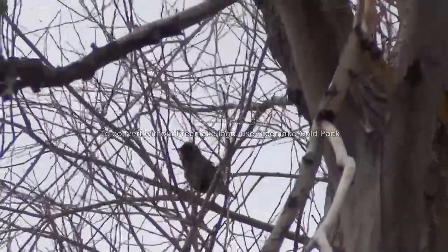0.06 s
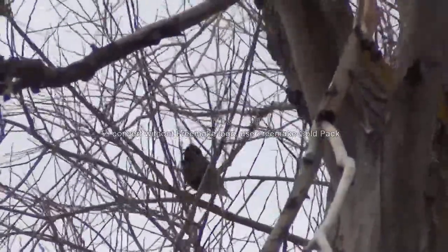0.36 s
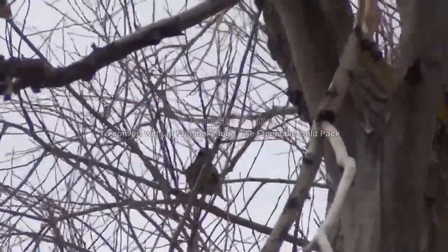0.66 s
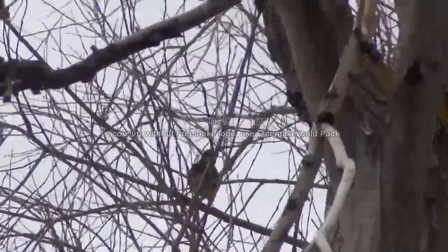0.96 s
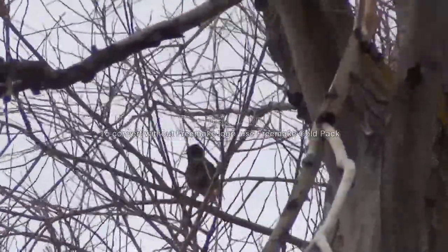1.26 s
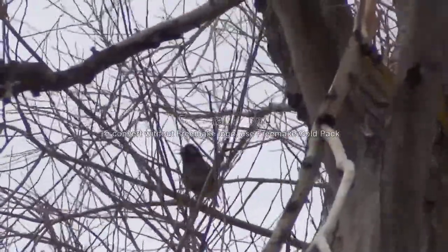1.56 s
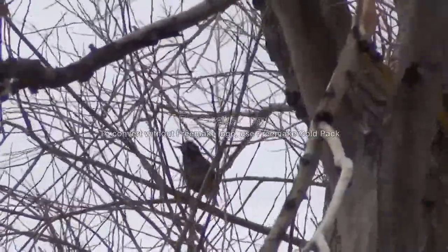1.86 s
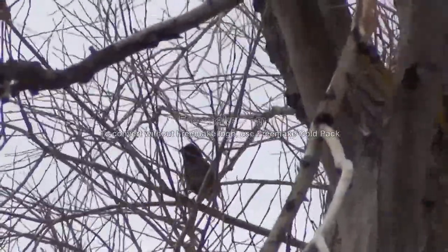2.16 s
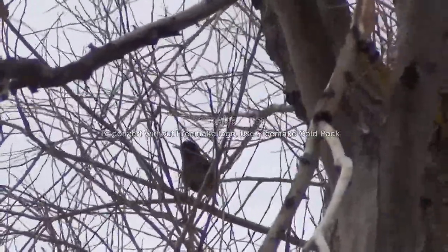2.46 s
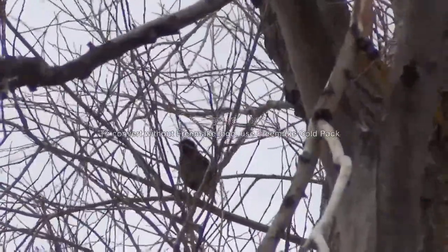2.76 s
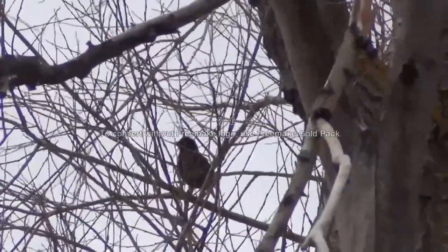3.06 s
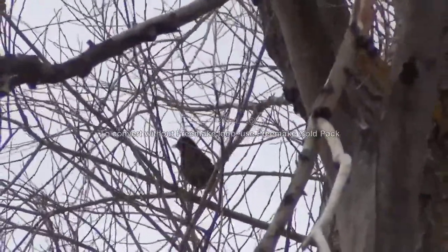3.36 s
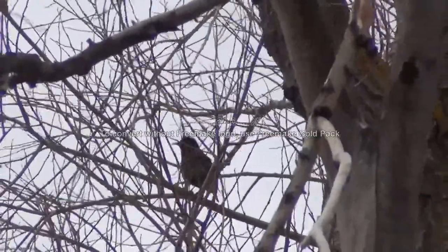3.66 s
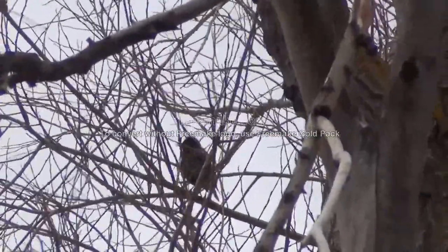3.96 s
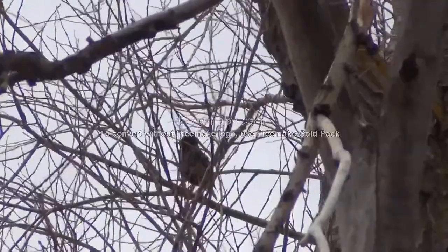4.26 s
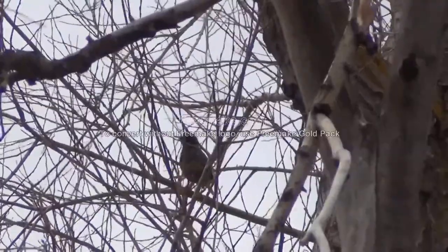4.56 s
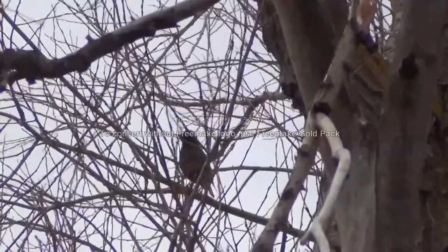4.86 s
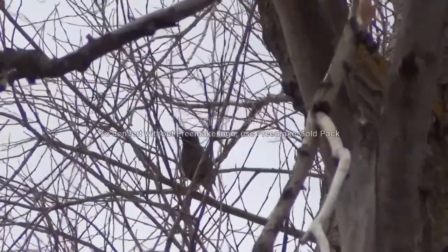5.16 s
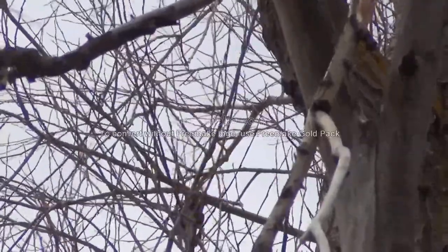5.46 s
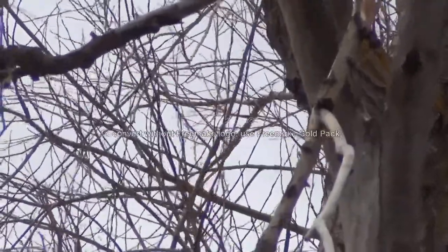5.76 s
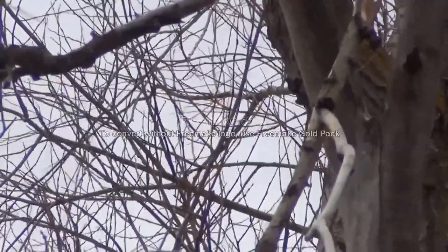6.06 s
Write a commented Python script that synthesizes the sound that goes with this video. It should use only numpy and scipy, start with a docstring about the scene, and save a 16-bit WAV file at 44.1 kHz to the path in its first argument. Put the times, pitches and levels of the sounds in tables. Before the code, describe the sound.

A starling sings quietly in a tree outdoors, over a faint electrical hum and distant rumble. For the first second and a half it gives short chirps, piping notes and hoarse rasps. From about 1.5 to 2.8 seconds an air rifle is worked close to the microphone: bright steel clacks, dull knocks on the stock and soft hand rustle, ending with a snap shut, while the bird chirps in between. The bird twitters from 3.2 seconds, holds a high whistle at 3.5 that slides downward, and rasps again near 4.8. At about 5.2 seconds the rifle fires once, the loudest sound: a sharp rush of air with hard ticks, a brief spring thrum, a thin steel ring and a short hissing tail. The background dips and creeps back. Light rustle, a faint chirp and a piping note follow, with a soft knock near 6.2 seconds.

```python
"""A starling rasps, chirps and whistles in a bare tree, over a faint mains hum and distant rumble.
Close by, the action of an air rifle is worked: steel parts clack, bounce and snap shut, knocking the stock.
Then the shot: a rush of air, a thrumming spring and a thin steel ring.
The microphone's automatic gain ducks under it and creeps back."""
import sys
import numpy as np
from scipy import signal
from scipy.fft import rfft, irfft, next_fast_len
from scipy.io import wavfile
from scipy.ndimage import map_coordinates

SR = 44100
rng = np.random.default_rng(int(sys.argv[2]) if len(sys.argv) > 2 else 0)


def bounce(signal):
    """Save signal as a 16-bit WAV file at the path given by the first command-line argument."""
    frames = np.transpose(np.atleast_2d(signal))
    limited = np.clip(frames, -1, 1)
    pcm = np.round(limited * 32767).astype(np.int16)
    wavfile.write(sys.argv[1], SR, pcm)


N = 274302

# Ringing modes of the steel and of the stock: (frequency [Hz], bandwidth [Hz], level [dB])
STEEL_MODES = [(1487, 56, -3), (1970, 79, 0), (2168, 55, -0.5), (2362, 92, 6), (2656, 430, -8),
               (3520, 120, -23), (6950, 290, -10.5), (8120, 260, -13)]
STOCK_MODES = [(149, 51, -1), (374, 72, 1), (544, 68, 2), (764.5, 24, 4.5), (860, 33, 4), (1188, 77, 3.5)]
# Tone colour of the air blast, its hissing tail and its low thump: (frequency [Hz], level [dB])
BLAST_EQ = [(25, -6.5), (60, -7), (250, -2), (520, -14), (790, 4), (1000, -15), (1500, 4), (2600, -1),
            (3700, 2), (6300, -2), (8200, -2), (12000, -1.5), (15500, -4)]
HISS_EQ = [(60, 6), (200, -10), (1000, -3.5), (3000, 0), (8000, 1), (11000, -2), (15500, -10.5)]
THUMP_EQ = [(12, -14.5), (25, -3.5), (42, 4.5), (58, -0.5), (80, -25), (200, -66)]
SHOT_S = 5.222  # the trigger breaks


def shot():
    """Air rushes through the ringing rifle, the spring thrums, the steel sings; a hiss trails off."""
    gusts = envelope(SHOT_S, attack_s=.022, hold_s=.063, fall_db_per_s=1899, depth_db=18.5)
    gusts *= amp(-19.5 + 1.76 * wobble(400))
    shaken = resonate(gusts * rng.standard_normal(N), STEEL_MODES + STOCK_MODES)
    rush = gusts * noise(BLAST_EQ) + amp(-15.5) * np.std(gusts) * shaken
    spring = envelope(SHOT_S, attack_s=.022, hold_s=.062, fall_db_per_s=700, depth_db=32)
    spring *= amp(-30 + 1.56 * wobble(60))
    spring *= np.sin(phase_of(150 + 13 * wobble(70)))
    thump_size = round(.12 * SR)
    thump = amp(-47) * unit(noise(THUMP_EQ)[:thump_size]) * signal.windows.tukey(thump_size, .3)
    ring = envelope(SHOT_S, attack_s=.049, hold_s=.018, fall_db_per_s=750, depth_db=25.5)
    ring *= amp(-21.5 + 2.5 * wobble(300))
    ring *= np.sqrt(2) * np.sin(phase_of(12735 + 85 * wobble(300)))
    leak = envelope(SHOT_S, attack_s=.08, hold_s=.045, fall_db_per_s=252, depth_db=30)
    leak *= amp(-30 + 2.2 * wobble(700))  # fast flicker makes the hiss crackle
    report = rush + spring + ring + leak * noise(HISS_EQ)
    add(report, SHOT_S + .006, thump)  # the pressure wave hits the microphone
    walls = amp(-20.5) * echoes(report, WALL_DECAY, width=.544)
    return report + walls + amp(-33) * echoes(report, GARDEN_DECAY, width=.5)


# Steel clacks of the action:
# (time [s], level [dB], knock send [dB], ring send [dB], treble tilt [dB/octave], t60 [s])
CLACK_CUES = [(.507, -54, -8, 4, 0, 0.034), (.532, -46.5, -12, -1.5, 9, 0.038),
              (1.5562, -25, -3, 7.5, -3.5, 0.042), (1.6686, -38, -1.5, 4.5, -1.5, .15),
              (1.7659, -30.5, -15, -6, 0, .04), (1.7698, -28.5, -3.5, -4, -1.5, 0.034),
              (1.773, -21, -20, -4.5, 0, .023), (1.786, -25, -14, -11, -.5, 0.086),
              (1.849, -24, -2, 7, -2.5, .034), (2.0184, -30.5, 3, 4.5, 4.5, 0.025),
              (2.069, -44.5, -6, 2, -6.5, 0.045), (2.099, -34.5, -14, -6.5, -5, 0.069),
              (2.138, -30, -14, -3, -5.5, 0.052), (2.146, -39, -7, 12, -15, 0.022),
              (2.216, -40.5, 6.5, 6.5, -2.5, 0.053), (2.53, -41.5, 3.5, -0.5, -7, 0.041),
              (2.7673, -22, -2.5, -4.5, -0.5, 0.066), (2.922, -60.5, -9, -12, 0, 0.17),
              (6.1712, -37.5, 5, -2, -15.5, 0.022)]
# Dull knocks on the stock: (time [s], level [dB], knock send [dB], treble tilt [dB/octave])
KNOCK_CUES = [(2.254, -48.5, 18, 0), (2.3385, -40, 13, -15.5), (2.344, -49, 14, -18),
              (2.587, -49.5, 18, -26), (2.594, -49, 12, -28)]
# Hard ticks of the mechanism as it fires: (time [s], level [dB])
TICK_CUES = [(5.2299, -23), (5.2342, -22), (5.2382, -16.5), (5.3162, -9), (5.32, -23.5), (5.341, -27),
             (5.352, -18.5)]
SCRAPE_S = .004  # lead-in to each contact


def rifle_action(bounce_s=.007, bounce_db=-11.5, chatter_s=.12):
    """Bright clacks that bounce once, dull knocks, and the ticks and random steel chatter of firing."""
    out = np.zeros((2, N))
    for s, db, *timbre in CLACK_CUES:
        add(out, s - SCRAPE_S, contact(db, *timbre))
        add(out, s - SCRAPE_S + bounce_s, contact(db + bounce_db, *timbre))
    for s, db, knock_db, tilt_db in KNOCK_CUES:
        add(out, s - SCRAPE_S, contact(db, knock_db, ring_db=-11, tilt_db=tilt_db, t60=.018))
    chatter = [(SHOT_S + .012 + chatter_s * when, -27.5 - 8 * weak) for when, weak in rng.random((14, 2))]
    for s, db in TICK_CUES + chatter:
        add(out, s - SCRAPE_S, contact(db, knock_db=-7.5, ring_db=-16, tilt_db=11.5, t60=.0055))
    return out


# Tone colour of a contact's transient: (frequency [Hz], level [dB])
CRACK_EQ = [(100, -27), (900, -20.5), (1500, -3), (2300, 0.5), (4500, 0.5), (5500, 0.5), (6200, -3),
            (7500, -5.5), (11000, -2.5), (15500, -15)]


def contact(db, knock_db, ring_db, tilt_db, t60):
    """One contact scrapes in, cracks, rings the steel and knocks the stock; nearby walls answer."""
    t = np.arange(SR // 3) / SR
    blow = (t >= SCRAPE_S) * amp(-60 * np.maximum(t - SCRAPE_S, 0) / t60)
    scrape = (t < SCRAPE_S) * amp(-15) * t / SCRAPE_S
    colour = [(hz, level + tilt_db * np.log2(max(hz, 1000) / 3000)) for hz, level in CRACK_EQ]
    crack = noise(colour, len(t)) * (scrape + blow) * amp(.5 * wobble(930, len(t)))
    ring = amp(ring_db - 4.5) * resonate(rng.standard_normal(len(t)) * blow ** 4, STEEL_MODES)
    knock = amp(knock_db - 10) * resonate(rng.standard_normal(len(t)) * blow ** 4, STOCK_MODES)
    clack = crack + np.std(crack) * (ring + knock)
    return amp(db) * (clack + amp(-5) * echoes(clack, WALL_DECAY, width=.21))


# Soft thuds of the hands: (time [s], level [dB], pitch [Hz], t60 [s])
BUMP_CUES = [(2.139, -41, 149, 0.24), (2.196, -36, 182, 0.068), (6.169, -42.5, 221, 0.14)]


def hand_bumps():
    """Each time a hand meets the stock it gives one low, damped thud."""
    out, t = np.zeros(N), np.arange(SR // 4) / SR
    attack = 1 - np.exp(-t / .0048)
    for s, db, hz, t60 in BUMP_CUES:
        add(out, s, amp(db - 60 * t / t60) * np.sin(2 * np.pi * hz * t) * attack)
    return out


# Falling chirps: (time [s], length [s], pitch [Hz], fall [share of pitch], level [dB], rasp [0-1])
CHIRP_CUES = [(0.142, .034, 3000, 0.016, -65, 0.73), (.243, .03, 4900, 0, -66.5, 0.7),
              (0.286, .033, 2400, .08, -65.5, 0.82), (.49, 0.027, 2010, 0.018, -58, .15),
              (0.59, .054, 4600, .06, -70, .8), (.935, .04, 2100, .07, -60.5, 0.82),
              (0.999, .048, 2130, .28, -62, .25), (1.001, .048, 3170, .26, -64.5, .25),
              (1.112, 0.031, 3280, .08, -55, .3), (1.113, 0.065, 2380, .15, -58.5, .7),
              (1.922, 0.033, 2930, .14, -55.5, .05), (2.043, .016, 1980, .07, -40.5, 0.27),
              (2.073, .055, 5010, 0.13, -56, 0.35), (2.106, 0.0256, 2056, 0.136, -42.5, .36),
              (2.556, .033, 2560, 0.096, -57.5, .85), (3.057, .034, 2555, .03, -60, 0.15),
              (3.82, .022, 2470, .14, -64, 0.84), (4.02, .065, 2370, 0, -65.5, 0.88),
              (4.455, 0.029, 2320, 0.11, -57.5, .95), (5.157, .03, 4100, .08, -61.5, .8),
              (5.533, 0.069, 1760, 0, -58.5, .8)]
# Arched twitters, strongest at the octave: (time [s], length [s], pitch [Hz], level [dB])
TWITTER_CUES = [(3.225, .054, 2320, -70), (3.264, .082, 2560, -63.5), (3.373, .06, 2540, -67.5),
                (3.428, 0.048, 2676, -56), (3.457, 0.03, 2930, -56.5), (3.865, .065, 2560, -63),
                (3.918, 0.069, 2684, -59.5), (4.088, 0.065, 2575, -62.5), (4.255, 0.069, 2645, -62.5)]
# Hoarse arched rasps: (time [s], length [s], pitch [Hz], level [dB], loudest harmonic [number])
RASP_CUES = [(0, .13, 3600, -68.5, 1.33), (1.348, .15, 3300, -62.5, 2.1), (1.492, 0.17, 3010, -59, 2.3),
             (4.673, .13, 3580, -62, 1.75), (4.705, 0.1, 3100, -63, 1.53), (4.844, .15, 3220, -57.5, 1.8),
             (4.87, .12, 2987, -60.5, 1.41)]
# Piping notes that scoop up to pitch:
# (time [s], length [s], pitch [Hz], level [dB], scoop [share of pitch], loudest harmonic [number])
PIPE_CUES = [(1.136, 0.114, 2930, -63, 0, 1.27), (1.206, .11, 1481, -57.5, 0.036, 1.42),
             (1.292, 0.12, 1465, -64.5, 0, 1.5), (1.383, .093, 1517, -58.5, .02, 1),
             (1.99, .075, 3190, -50, .19, 1), (2.211, .09, 4766, -54, .06, 1),
             (6.04, 0.18, 1510, -65.5, 0.04, 0.91)]


def starling():
    """Chirps, twitters, rasps, piping notes and one long whistle, echoing in the garden."""
    song = whistle()
    for s, length, hz, fall, db, rasp in CHIRP_CUES:
        bend = (1 + .42 * fall, 1 - .58 * fall)  # the fall steepens in the second half
        add(song, s, note(length, hz, db, bend, loudest=1.1, rasp=rasp, fall_db=27))
    for s, length, hz, db in TWITTER_CUES:
        add(song, s, note(length, hz, db, bend=(.89, .92), loudest=2.15, rasp=.253, fall_db=19.5))
    for s, length, hz, db, loudest in RASP_CUES:
        add(song, s, note(length, hz, db, bend=(.76, .84), loudest=loudest, rasp=.72, fall_db=25.5))
    for s, length, hz, db, scoop, loudest in PIPE_CUES:
        add(song, s, note(length, hz, db, bend=(1 - scoop, 1), loudest=loudest, rasp=.198, fall_db=27))
    return song + amp(-7) * echoes(song, GARDEN_DECAY, width=.12)


# Held part of the whistle: (time [s], pitch [Hz], fundamental level [dB], octave level [dB])
WHISTLE_CURVE = [(3.48, 3180, -66, -66), (3.496, 3210, -52, -66), (3.512, 3117, -53.5, -72),
                 (3.53, 3173, -68, -73), (3.558, 3250, -64.5, -71), (3.646, 3200, -71, -68),
                 (3.68, 3388, -71, -71)]
# Closing slide, a voice on each side of the syrinx: (top pitch [Hz], target pitch [Hz], level [dB])
SLIDE_PAIR = [(4720, 3660, -47), (4050, 3100, -59)]


def whistle(slide_start_s=3.68, slide_length_s=.22, settle_s=.062, fall_db=19):
    """A held tone whose octave comes forward, then two voices sliding down, duller as they fade."""
    t = np.arange(N) / SR
    times, *columns = np.transpose(WHISTLE_CURVE)
    pitch, fundamental_db, octave_db = [np.interp(t, times, column) for column in columns]
    loudest = np.clip(1.5 + (octave_db - fundamental_db) / (2 * fall_db), 1, 2)
    held = (t >= times[0]) & (t <= times[-1])
    level = held * amp(2) * np.hypot(amp(fundamental_db), amp(octave_db))
    out = level * syrinx(pitch, loudest, rasp=.12, fall_db=fall_db)
    age = np.maximum(t - slide_start_s, 0)
    effort = envelope(slide_start_s, attack_s=.016, hold_s=.044, fall_db_per_s=208, depth_db=36)
    effort *= age < slide_length_s
    for top_hz, target_hz, db in SLIDE_PAIR:
        pitch = target_hz + (top_hz - target_hz) * np.exp(-age / settle_s)
        out += amp(db) * effort * syrinx(pitch, 1 + .29 * effort, rasp=.1, fall_db=fall_db)
    return out


def note(length, hz, db, bend, loudest, rasp, fall_db):
    """One note swells and fades, arching through hz; bend holds its start and end pitch ratios."""
    progress = np.linspace(0, 1, int(length * SR))
    arch = np.polyval(np.polyfit([0, .5, 1], [bend[0], 1, bend[1]], 2), progress)
    pitch = hz * arch * (1 + .0083 * wobble(139.6, len(arch)))
    return amp(db) * signal.windows.tukey(len(arch), .5) * syrinx(pitch, loudest, rasp, fall_db)


def syrinx(pitch, loudest, rasp, fall_db):
    """The throat favours one harmonic, the rest drop fall_db a step; rasp smears each into noise."""
    size = len(pitch)
    phase = phase_of(pitch * (1 + .034 * rasp ** 2 * wobble(260, size)))
    tone = np.zeros(size)
    for k in range(1, 5):
        rate = (300 + 600 * rasp) * k
        flutter = wobble(rate, size) + 1j * wobble(rate, size)
        partial = np.real((1 - rasp + rasp * flutter) * np.exp(1j * k * phase))
        tone += amp(-fall_db * abs(k - loudest)) * partial
    return unit(tone * amp(2.1 * wobble(110, size)))


# Swells of rustle as the hands shift, and a brief flutter of wings at 5.58 s: (time [s], half width [s], level
# [dB])
RUSTLE_CUES = [(1.3, 0.47, -61.5), (2.19, 0.06, -50), (2.38, 0.055, -57.5), (2.575, 0.042, -56.5),
               (3.03, 0.094, -57), (5.58, 0.12, -55.5), (5.76, .16, -62)]
# Tone colour of the rustle: (frequency [Hz], level [dB])
RUSTLE_EQ = [(100, -10), (200, 5), (700, -2), (2000, -2.5), (3500, -9), (8000, -16), (15000, -21.5)]


def hand_rustle(floor_db=-66):
    """Hands on the rifle make a grainy rustle that swells when they shift; once, wings flutter."""
    t = np.arange(N) / SR
    swells = sum(amp(db) ** 2 * np.exp(-((t - s) / width) ** 2) for s, width, db in RUSTLE_CUES)
    grain = amp(1.9 * wobble(35) + 1.3 * wobble(250))
    return np.sqrt(amp(floor_db) ** 2 + swells) * grain * stereo_noise(RUSTLE_EQ)


# Tone colour of the low and high ambience beds: (frequency [Hz], level [dB])
RUMBLE_EQ = [(15, -59), (25, -31), (40, -11), (54, -2), (86, -2.5), (211, -0.5), (253, -0.5), (364, -6.5),
             (389, -14), (415, 1), (451, -21), (474, -1.5), (507, -15.5), (889, -11), (1300, -23),
             (1690, -48), (2860, -120)]
AIR_EQ = [(470, -33), (800, -5.5), (1380, -6.5), (1620, -25), (1770, -26), (2800, -17), (3960, -16),
          (5750, -22), (15500, -17)]


def ambience():
    """Distant rumble and faint hiss, each drifting slightly in level."""
    rumble = amp(-59.5 + .82 * wobble(5.07)) * stereo_noise(RUMBLE_EQ)
    return rumble + amp(-69 + .63 * wobble(1.8)) * stereo_noise(AIR_EQ)


# Partials of the hum: (frequency [Hz], level [dB])
HUM_PARTIALS = [(60, -66.5), (120, -71), (180, -74), (420, -72.5)]


def mains_hum():
    """Harmonics of the mains, each wavering in level and phase."""
    t = np.arange(N) / SR
    return sum(amp(db + 1.2 * wobble(5.8)) * np.sqrt(2) * np.sin(2 * np.pi * hz * t + .37 * wobble(4.2))
               for hz, db in HUM_PARTIALS)


# Reverb time of the nearby walls and of the garden: (frequency [Hz], t60 [s])
WALL_DECAY = [(200, 0.42), (1400, 0.16), (4000, 0.16), (12000, 0.15)]
GARDEN_DECAY = [(1000, 0.19), (4000, 0.44), (10000, 0.47)]
# Stereo width of the reverb: (frequency [Hz], side gain [dB])
REVERB_WIDTH = [(300, -1), (1000, 1.5), (3000, -6.5), (5000, -1.5), (6500, 11), (8500, 6), (11500, -5),
                (15000, -10)]


def echoes(x, decay, width):
    """Stereo reflections in which each frequency dies at its own speed."""
    hz, t, spectra = signal.stft(rng.standard_normal((2, SR // 2)), SR, nperseg=256)
    tail = signal.istft(spectra * amp(-60 * t / along(decay, hz)[:, None]), SR, nperseg=256)[1]
    mid, side = signal.fftconvolve(x[None], tail / np.linalg.norm(tail[0]), axes=1)[:, :len(x)]
    side = filtered(side, lambda f: width * amp(along(REVERB_WIDTH, f)))
    return np.array([mid + side, mid - side])


# Stereo width of the noise beds: (frequency [Hz], side minus mid [dB])
BED_WIDTH = [(60, -4.5), (150, -20.5), (380, -25.5), (950, -17), (2380, -71), (5980, -11), (15000, -24)]


def stereo_noise(spectrum):
    """Coloured noise, mostly alike in both channels."""
    mid = noise(spectrum)
    side = filtered(noise(spectrum), lambda hz: amp(along(BED_WIDTH, hz)))
    return np.array([mid + side, mid - side])


def noise(spectrum, size=N):
    """Coloured noise of rms 1."""
    return unit(filtered(rng.standard_normal(size), lambda hz: amp(along(spectrum, hz))))


def resonate(drive, modes):
    """The drive rings a few modes of alternating polarity; the result has rms 1."""
    return unit(filtered(drive, lambda f: sum(
        (-1) ** k * amp(db) * 1j * f * width / (hz * hz - f * f + 1j * f * width)
        for k, (hz, width, db) in enumerate(modes))))


def envelope(start_s, attack_s, hold_s, fall_db_per_s, depth_db):
    """Gain that climbs depth_db during the attack, holds, then dies away."""
    t = np.arange(N) / SR - start_s
    rise_db = depth_db * (np.clip(t / attack_s, 0, 1) - 1)
    return (t >= 0) * amp(rise_db - fall_db_per_s * np.maximum(t - attack_s - hold_s, 0))


def wobble(rate, size=N):
    """A smooth random curve, rate knots a second."""
    return map_coordinates(rng.standard_normal(int(size * rate / SR) + 4), [np.arange(size) * rate / SR])


def filtered(x, response):
    """x through a complex frequency response."""
    size = x.shape[-1]
    padded = next_fast_len(size + 8192)
    return irfft(rfft(x, padded) * response(np.fft.rfftfreq(padded, 1 / SR)), padded)[..., :size]


def along(points, hz):
    """(Hz, value) points read on a log axis."""
    freqs, values = np.transpose(points)
    return np.interp(np.log(hz + 1), np.log(freqs + 1), values)


def add(track, s, sound):
    """Mix a sound into a track at time s."""
    part = track[..., max(round(s * SR), 0):][..., :sound.shape[-1]]
    part += sound[..., :part.shape[-1]]


def phase_of(hz):
    """Running phase of a moving pitch."""
    return 2 * np.pi * np.cumsum(hz) / SR


def amp(db):
    """Decibels to gain."""
    return 10 ** (np.asarray(db) / 20)


def unit(x):
    """x at rms 1."""
    return x / np.sqrt(np.mean(x ** 2) + 1e-20)


# Balance of the two microphone ports: (frequency [Hz], left minus right [dB])
PORT_BALANCE = [(60, -5.5), (150, -1), (300, 1.5), (700, -2.2), (2400, -0.5), (6000, -0.5), (13000, 0)]
# Phase between the ports: (frequency [Hz], left lead [rad])
PORT_PHASE = [(0, 0.014), (6200, 0.0), (6800, 0.3), (8010, 0.0), (16200, 0.0)]


def scene():
    """Bird and rifle, coloured slightly differently by each port, over beds that lean right."""
    sides = np.array([[.5], [-.5]])
    ports = lambda hz: amp(sides * along(PORT_BALANCE, hz)) * np.exp(1j * sides * along(PORT_PHASE, hz))
    foreground = filtered(starling() + rifle_action() + hand_bumps() + shot(), ports)
    beds = (ambience() + hand_rustle()) * amp([[-.4], [.4]])
    return foreground + beds + mains_hum() * amp([[-1.8], [1.2]])


def auto_gain(x, threshold_db, slope, recover_db_per_s):
    """Sustained loud sound pulls the gain down; it creeps back at a steady rate."""
    power = signal.lfilter([1 / (.06 * SR)], [1, 1 / (.082 * SR) - 1], np.mean(x ** 2, axis=0))
    duck_db = slope * np.maximum(10 * np.log10(power + 1e-12) - threshold_db, 0)
    creep_db = recover_db_per_s * np.arange(N) / SR
    return x * amp(creep_db - np.maximum.accumulate(duck_db + creep_db))


def record(dry):
    """The microphone rides its gain and cuts the very top of the treble."""
    levelled = auto_gain(dry, threshold_db=-33, slope=.48, recover_db_per_s=6)
    cutoff_hz, edge_hz = 15600, 600
    return filtered(levelled, lambda hz: np.clip((cutoff_hz - hz) / edge_hz + .5, 0, 1))


dry = scene()
out = record(dry)
bounce(out)
```